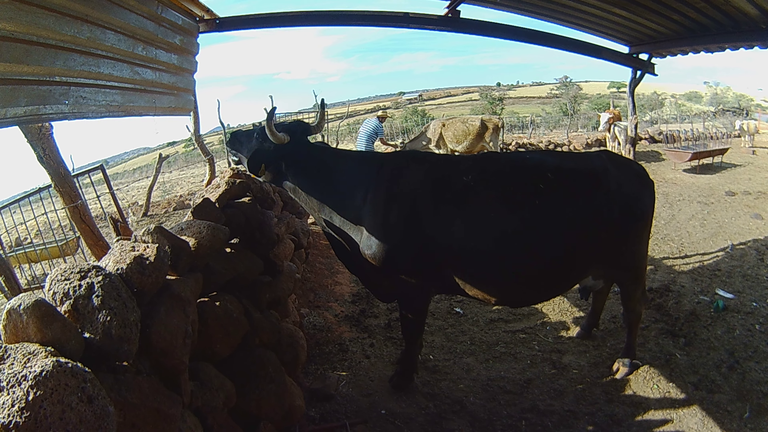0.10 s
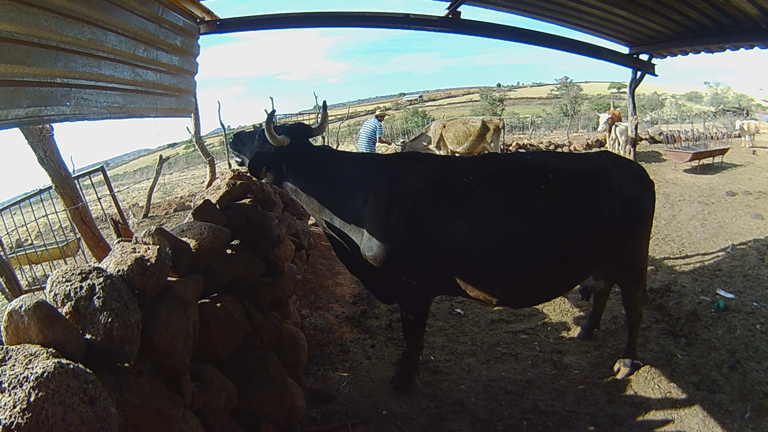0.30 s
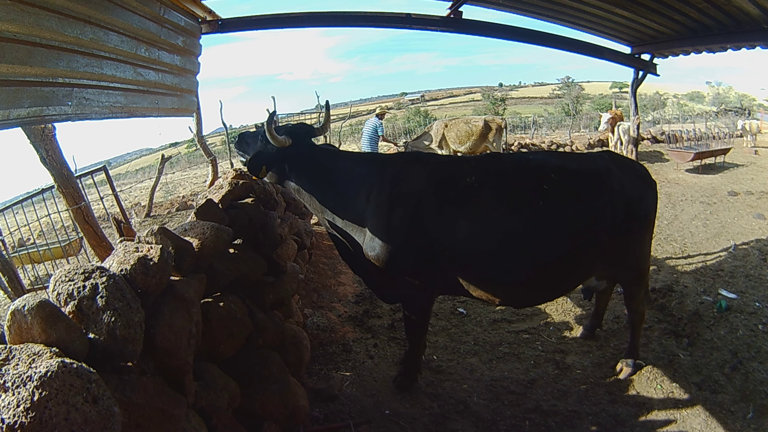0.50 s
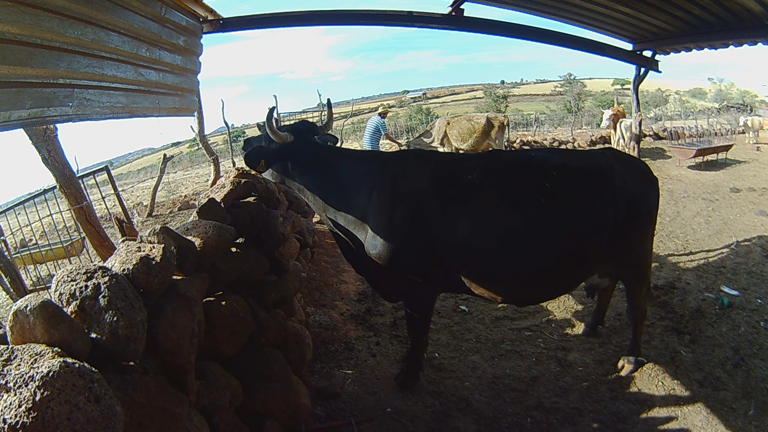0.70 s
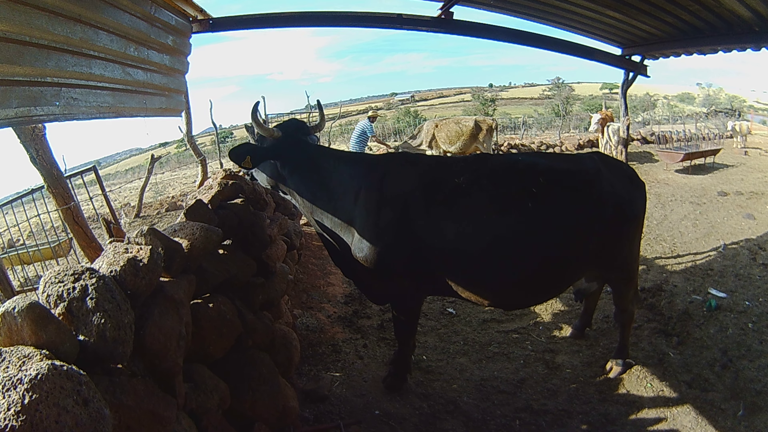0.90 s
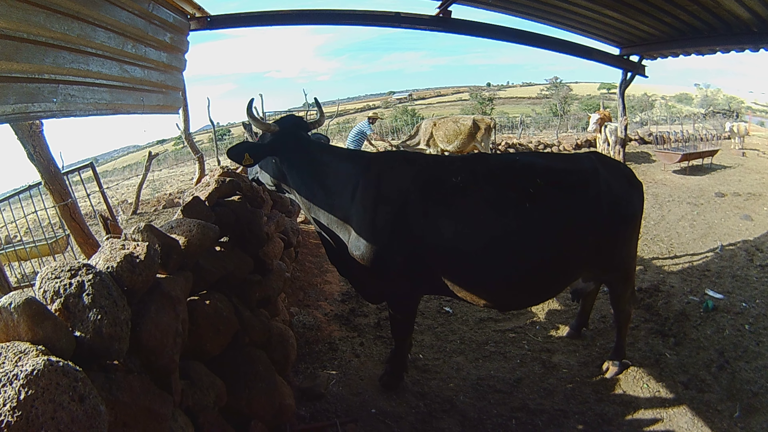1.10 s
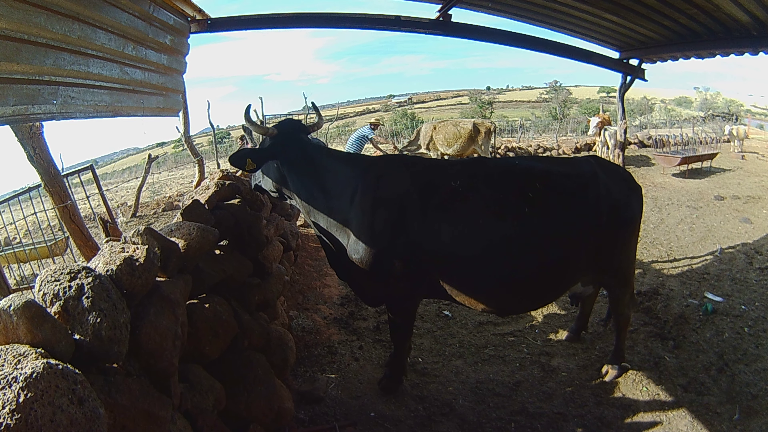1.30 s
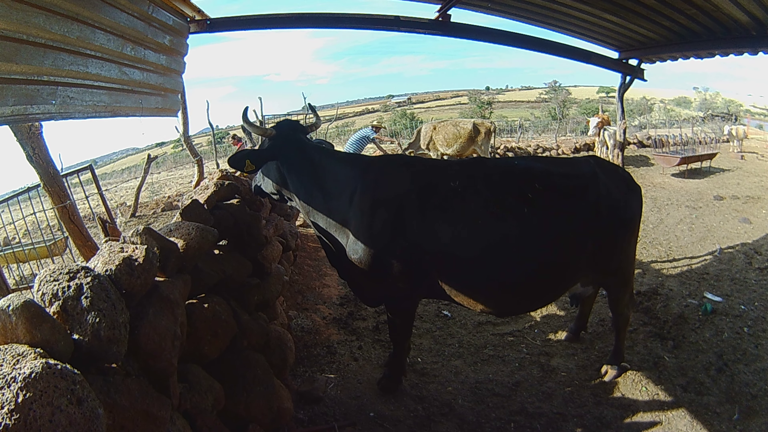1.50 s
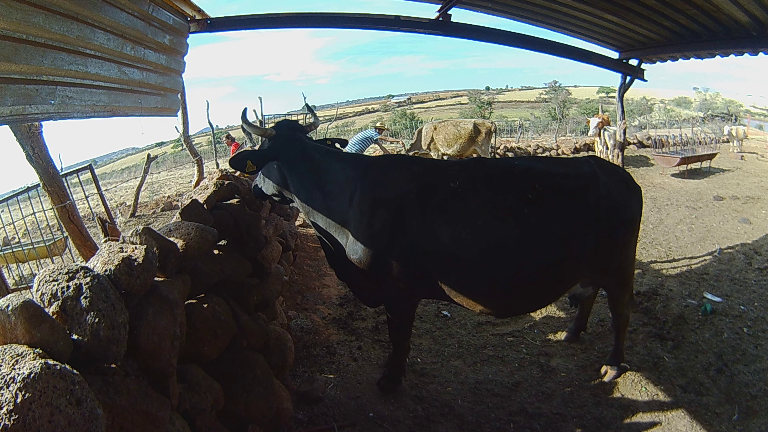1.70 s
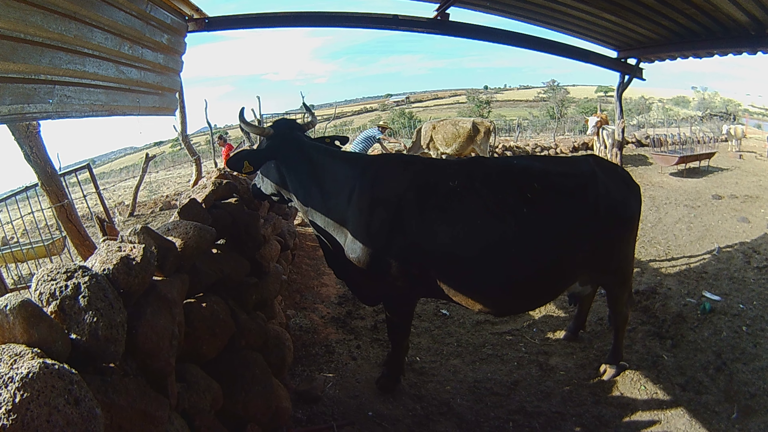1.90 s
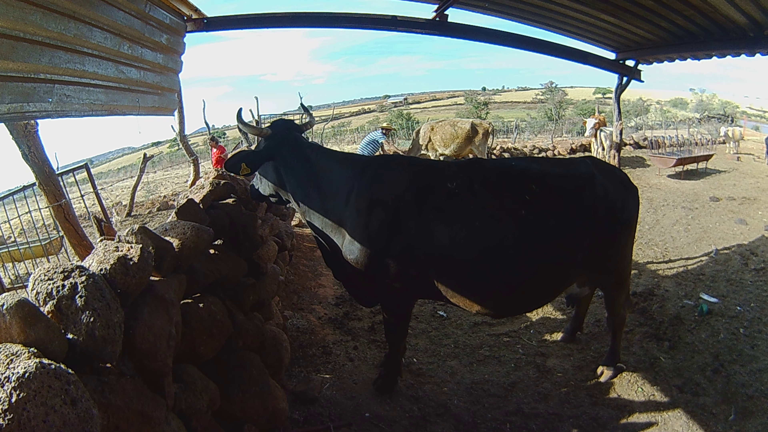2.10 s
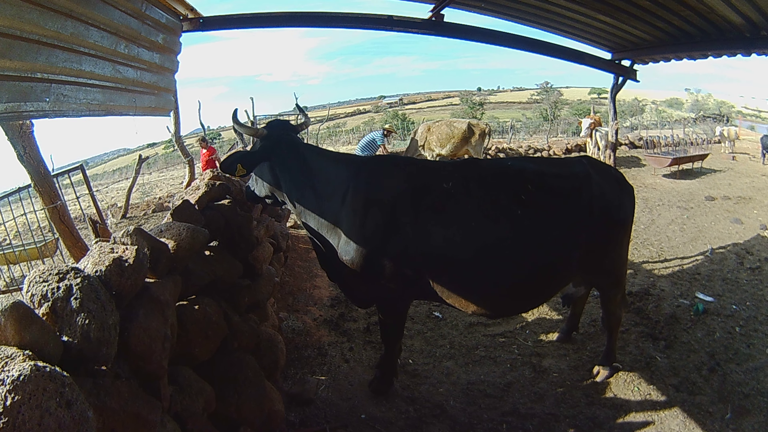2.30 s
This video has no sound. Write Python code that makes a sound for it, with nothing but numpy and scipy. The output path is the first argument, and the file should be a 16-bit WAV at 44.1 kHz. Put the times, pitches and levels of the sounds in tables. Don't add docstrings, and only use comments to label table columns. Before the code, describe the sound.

Loud strained cow moo cuts off with a throaty croak, then faint snort and one knock

```python
import sys
import numpy as np
from scipy import signal
from scipy.fft import rfft, irfft
from scipy.io import wavfile

SR = 44100
rng = np.random.default_rng(int(sys.argv[2]) if len(sys.argv) > 2 else 0)


def natural_amplitude(level_db):
    exponent = np.asarray(level_db, float) / 20
    return 10 ** exponent


def master_out(mix):
    frames = np.transpose(np.atleast_2d(mix))
    ceiling = np.clip(frames, -1, 1)
    pcm = np.round(ceiling * 32767).astype(np.int16)
    wavfile.write(sys.argv[1], SR, pcm)


N = 109368

# (frequency [Hz], level [dB])
WIND_LEVEL = [(0, -40.5), (.4, -43.5), (.7, -38.5), (1.0, -37), (1.22, -36.5), (1.28, -39.5), (1.34, -38),
              (1.5, -42), (1.75, -47), (1.92, -51), (2.1, -46), (2.3, -43), (2.48, -44.5)]
WIND_SPECTRUM = [(12, -10.5), (40, -2.5), (90, -8), (160, -13.5), (300, -25), (600, -34.5), (1500, -44.5),
                 (3000, -67)]
# (frequency [Hz], level [dB])
YARD_SPECTRUM = [(120, -27.5), (250, -1.5), (700, -9.5), (1500, -10.5), (3000, -15), (7000, -19.5),
                 (12000, -21), (18000, -21)]
YARD_DB = -59
# (frequency [Hz], level [dB])
WHINE = [(16901, -72)]

# (time [s], pitch [Hz], level [dB], second overtone [dB])
HIGH_VOICE = [(0, 519.3, -22, -5), (.075, 512.5, -19, -3), (.17, 511.5, -18.5, 0), (.27, 512, -18.2, 0),
              (.38, 508.5, -17, -1.5), (.45, 502.5, -16.3, -10), (.5, 504.5, -15.5, -6),
              (.54, 499, -15.5, -8), (.58, 422, -28, -3)]
# (time [s], pitch [Hz])
LOW_VIBRATION = [(0, 234.2), (.17, 233.6), (.33, 224.8), (.46, 231.1), (.515, 250.7), (.548, 286),
                 (.572, 300), (.605, 238), (.66, 203)]
# (time [s], low vibration [dB], third-pitch lock [dB], rough air [dB], mouth opening [1 = open])
EFFORT = [(0, -25.5, -42, -29, 0.93), (.1, -26.5, -30.5, -29.5, 1.), (.26, -31.5, -42.5, -28.5, 0.96),
          (.33, -40, -29, -29, 0.94), (.42, -37.5, -28, -30, 1), (.5, -28, -24, -32, .92),
          (.56, -26.5, -41, -32, .86), (.61, -35, -67, -36, .76), (.66, -59, -63, -53, 0.7)]
# (multiple [1], level at the start [dB], loss [dB/s])
OVERTONES = [(1, 4, 10.5), (2, 2, 21), (3, -20.5, 34), (4, -37, -1.5), (5, -46, 5), (7, -52, 9),
             (8, -53.5, 11), (10, -50.5, 13.5)]
# (multiple of high [1], multiple of low [1], level [dB])
MIXING_LINES = [(0, 1, -2.5), (1, -1, -7.5), (1, 1, -4.5), (2, -1, -19.5), (2, 1, -19), (3, -1, -9),
                (1, 2, -12), (4, -1, -26.5)]
# (number of thirds [1], level [dB])
THIRD_LINES = [(2, -15), (4, -19), (5, -1.5), (7, -14), (8, -20.5), (10, -24)]
# (frequency [Hz], width [Hz], level [dB], share of mouth movement [1])
OPEN_THROAT = [(223, 50, -11, -1.7), (358, 59, -13.5, 0), (667, 68, -9.5, .3), (920, 36, -6, 1),
               (850, 230, -4, 0.24), (1047, 180, -11, -0.42), (1397, 274, -9, -0.077),
               (1606, 550, -18.5, -0.024), (2173, 95, -32.5, -0.36), (3580, 120, -31.5, 0),
               (4260, 190, -30.5, -0.77), (5020, 630, -27, 0.19), (6310, 610, -35, -0.48),
               (6850, 840, -35, 0.41)]
LOW_WAVER = 0.0086
HANDOVER_S = 0.58
DULLING_DB_PER_S, DULL_ABOVE_HZ = 9.5, 2800

# (delay [s], level [dB])
ECHOES = [(.009, -12), (.017, -32), (0.03, -30)]
TAIL_DB, TAIL_T60_S = -21, 0.99

# (frequency [Hz], width [Hz], level [dB])
SNAP = [(.2925, -33)]
SNAP_BODY = [(3900, 1400, -3), (5780, 1500, -0.5), (10300, 1300, -1), (12000, 1500, -10),
             (15500, 1600, -12)]

# (time [s], pulse rate [1/s], level [dB], chest pitch [Hz], throat share [dB])
CREAK = [(.53, 142, -34, 262, -11), (.556, 143, -15.5, 287, -11), (.574, 142, -17.5, 278, -7),
         (.589, 141, -26, 272, 0), (.605, 141, -19, 245, -5), (.618, 100, -24, 230, -11),
         (.632, 73, -24, 217, -14), (.65, 72, -33, 201, -11), (.7, 70, -52, 200, -8)]
# (frequency [Hz], width [Hz], level [dB], share of mouth movement [1])
CLOSING_THROAT = [(414, 77, -5.5, 0.066), (529, 62, -6.5, 0.2), (912, 118, 2.5, 0.81),
                  (1100, 62, -8.5, 0.74), (1215, 63, -11, 0.28), (1483, 104, -14, 0.13),
                  (1920, 144, -34.5, 0.6), (3570, 300, -33.5, 0)]
CREAK_JITTER = .05
THROB_PER_S, THROB_FROM_S, THROB_DEPTH = 64, .556, .5
CHEST_PULSE_DB = -8
BELLY_HZ, BELLY_DB, BELLY_FROM_S = 145, -8, .59

# (start [s], rise [s], hold [s], fall [dB/s], level [dB])
BREATHS = [
    (0.675, 0.061, .12, 126, -45),
    (1.474, 0.01, 0.01, 55, -45.5),
    (1.66, 0.027, 0.024, 15, -58.5),
    (1.353, 0.0099, .01, 300, -58),
    (2.2, 0.069, 0.058, 165, -64.5),
    (2.403, 0.029, .05, 100, -61),
]
# (start [s], fall [dB/s], level [dB])
SPURTS = [
    (1.483, 300, -50),
    (1.5, 90, -58),
    (1.665, 80, -61.5),
    (.7, 25, -65),
    (2.13, 100, -66),
]
# (frequency [Hz], level [dB])
SPURT_SPECTRUM = [(1200, 8), (2000, 8), (2900, 1), (3650, 1.5), (5000, 3.5), (6500, -1.5), (8000, -11),
                  (10000, -28)]
# (frequency [Hz], width [Hz], level [dB])
NOSTRILS = [(371, 96, -1.5), (633, 340, 6), (800, 215, 3), (1045, 300, 3.5), (1432, 340, -0.5),
            (1990, 330, -19), (3580, 530, -13)]
WHISTLE_HZ, WHISTLE_WIDTH_HZ, WHISTLE_DB = 3630, 390, -9

# (frequency [Hz], level [dB], t60 [s])
KNOCK = [(2.3035, -16)]
KNOCK_BODY = [(95, -10, 0.089), (340, -1.5, 0.024), (537, -4.5, 0.0077), (692, 4, 0.028), (840, 4, 0.03),
              (1130, -4, 0.041), (1550, -8, .018), (1630, 1, 0.019), (2150, -7.5, 0.022), (2610, -7, 0.013),
              (3770, -12, 0.018), (4330, -13, 0.015), (5760, -9, 0.014), (6880, -11, 0.013)]
KNOCK_GRIT = .6
BOUNCE_S, BOUNCE_DB = .0055, -12


def evened(x):
    return x / np.sqrt(np.mean(x ** 2) + 1e-20)


def along(table):
    rows = np.transpose(table)
    return [np.interp(np.arange(N) / SR, rows[0], column) for column in rows[1:]]


def drift(hz):
    spectrum = rfft(rng.standard_normal(N))[1:]
    f = np.fft.rfftfreq(N, 1 / SR)[1:]
    return evened(irfft(spectrum / (1 + (f / hz) ** 2), N))


def coloured(points):
    f, db = np.transpose(points)
    hz = np.fft.rfftfreq(N, 1 / SR)
    gain = natural_amplitude(np.interp(np.log(hz + 1), np.log(f + 1), db, -90, -90))
    return evened(irfft(rfft(rng.standard_normal(N)) * gain, N))


def resonate(x, hz, width):
    turn = np.exp(2j * np.pi * np.cumsum(hz * np.ones(len(x))) / SR)
    r = np.exp(-np.pi * width / SR)
    return 2 * (turn * signal.lfilter([(1 - r) ** 2], [1, -2 * r, r * r], x / turn)).real


def outdoors():
    t = np.arange(N) / SR
    gusts = natural_amplitude(1.5 * drift(hz=15))
    wind = evened(coloured(WIND_SPECTRUM) * gusts) * natural_amplitude(along(WIND_LEVEL)[0])
    yard = natural_amplitude(YARD_DB + 0.54 * drift(hz=6)) * coloured(YARD_SPECTRUM)
    whine = sum(np.sqrt(2) * natural_amplitude(db) * np.sin(2 * np.pi * f * t) for f, db in WHINE)
    return wind + yard + whine


def throat(x, mouth, tract):
    t = np.arange(N) / SR
    out = np.zeros(N)
    for f, width, db, share in tract:
        dulling = DULLING_DB_PER_S * t * (f > DULL_ABOVE_HZ)
        moving_hz = f * (1 + share * (mouth - 1))
        out += natural_amplitude(db - dulling) * evened(resonate(x, moving_hz, width))
    return out


def moo():
    t = np.arange(N) / SR
    high_hz, high_db, second_db = along(HIGH_VOICE)
    low_hz = along(LOW_VIBRATION)[0]
    low_db, lock_db, air_db, mouth = along(EFFORT)
    after_break = np.maximum(t - HIGH_VOICE[-1][0], 0)
    high_db = high_db - 900 * after_break
    low_db = low_db - 300 * np.maximum(t - EFFORT[-1][0], 0)
    high = 2 * np.pi * np.cumsum(high_hz * (1 + .001 * drift(hz=40))) / SR
    low = 2 * np.pi * np.cumsum(low_hz * (1 + LOW_WAVER * drift(hz=25.37))) / SR
    held = natural_amplitude(-900 * np.maximum(t - HANDOVER_S, 0))
    coupled = natural_amplitude(-600 * after_break)

    voice = np.zeros(N)
    for k, db, loss in OVERTONES:
        level = high_db + db - loss * t + (k == 2) * second_db + .5 * min(k, 5) * drift(hz=30.08)
        voice += natural_amplitude(level) * np.cos(k * high - 0.89 * k * k)
    for m, n, db in MIXING_LINES:
        line = natural_amplitude(db + 1.2 * drift(hz=32)) * np.cos(m * high + n * low)
        voice += natural_amplitude(low_db) * line * (coupled if m else held)
    for k, db in THIRD_LINES:
        line = np.cos(k * high / 3 + 0.45 * drift(hz=29))
        voice += natural_amplitude(lock_db) * natural_amplitude(db + 2.84 * drift(hz=23.0)) * line

    air = rng.standard_normal(N) * (1 + 0.66 * np.cos(high)) * natural_amplitude(1.2 * drift(hz=60))
    return np.sqrt(2) * voice + natural_amplitude(air_db) * throat(air, mouth, OPEN_THROAT) * (t < .75)


def shed(x):
    t = np.arange(SR // 2) / SR
    taps = rng.standard_normal(len(t)) * natural_amplitude(-60 * t / TAIL_T60_S) * (t > .02)
    taps *= natural_amplitude(TAIL_DB) / np.linalg.norm(taps)
    for delay, db in ECHOES:
        taps[round(delay * SR)] += natural_amplitude(db)
    return x + signal.fftconvolve(x, taps)[:N]


def placed(hit, event):
    start, db = event
    out = np.zeros(N)
    out[round(start * SR):][:len(hit)] += natural_amplitude(db) * hit / abs(hit).max()
    return out


def snap():
    t = np.arange(3000) / SR
    grit = rng.standard_normal(len(t)) * natural_amplitude(-60 * t / .006)
    tick = (t == 20 / SR) + .2 * grit
    return placed(sum(natural_amplitude(db) * evened(resonate(tick, f, width)) for f, width, db in SNAP_BODY), SNAP[0])


def creak():
    rate, db, chest_hz, throat_db = along(CREAK)
    t = np.arange(N) / SR
    cycles = np.cumsum(rate * (1 + CREAK_JITTER * drift(hz=78.8))) / SR
    pulses = np.diff(np.floor(cycles), prepend=0)
    pulses = pulses * natural_amplitude(1.5 * rng.standard_normal(N)) / np.sqrt(rate)
    pulses = pulses + .0015 * rng.standard_normal(N)
    throb = 1 + THROB_DEPTH * np.cos(2 * np.pi * THROB_PER_S * (t - THROB_FROM_S))
    hum = np.sqrt(2) * np.cos(2 * np.pi * np.cumsum(chest_hz) / SR) * throb
    chest = natural_amplitude(CHEST_PULSE_DB) * evened(resonate(pulses, chest_hz, 190))
    upper = natural_amplitude(throat_db) * throat(pulses, along(EFFORT)[3], CLOSING_THROAT)
    belly_in = np.clip((t - BELLY_FROM_S) / 0.025, 0, 1)
    belly = natural_amplitude(BELLY_DB) * belly_in * evened(resonate(pulses, BELLY_HZ, 70))
    return (hum + chest + upper + belly) * natural_amplitude(db) * (t > CREAK[0][0]) * (t < CREAK[-1][0])


def breaths():
    t = np.arange(N) / SR
    flutter = natural_amplitude(1.5 * drift(hz=80))
    nose = np.zeros(N)
    for f, width, db in NOSTRILS:
        nose += natural_amplitude(db) * evened(resonate(rng.standard_normal(N) * flutter, f, width))
    body = np.zeros(N)
    for start, rise, hold, fall, db in BREATHS:
        falling = fall * np.maximum(t - start - rise - hold, 0)
        body += np.clip((t - start) / rise, 0, 1) * natural_amplitude(db - falling)
    edge = np.zeros(N)
    for start, fall, db in SPURTS:
        edge += np.clip((t - start) / 0.004, 0, 1) * natural_amplitude(db - fall * np.maximum(t - start, 0))
    hiss = coloured(SPURT_SPECTRUM) * flutter
    whistle = natural_amplitude(WHISTLE_DB) * evened(resonate(hiss, WHISTLE_HZ, WHISTLE_WIDTH_HZ))
    return evened(nose) * body + (hiss + whistle) * edge


def knock():
    t = np.arange(3000) / SR
    grit = rng.standard_normal(len(t))
    rise = np.minimum(t / .005, 1) ** 2
    hit = np.zeros(len(t))
    for f, db, t60 in KNOCK_BODY:
        decay = natural_amplitude(-60 * np.maximum(t - .005, 0) / t60)
        rough = KNOCK_GRIT * evened(resonate(grit, f, 0.078 * f + 80))
        tone = np.sin(2 * np.pi * f * (t - .0051))
        hit += natural_amplitude(db) * evened(decay * (rough - tone) * rise)
    hit = hit - natural_amplitude(BOUNCE_DB) * np.roll(hit, round(BOUNCE_S * SR))
    return placed(hit, KNOCK[0])


def scene():
    cow = shed(moo() + creak() + breaths())
    return (cow + snap() + knock() + outdoors())[None]


def roll_off(x):
    return signal.sosfilt(signal.butter(12, 17250, fs=SR, output="sos"), x)


def record(dry):
    return roll_off(dry)


dry = scene()
out = record(dry)
master_out(out)
```